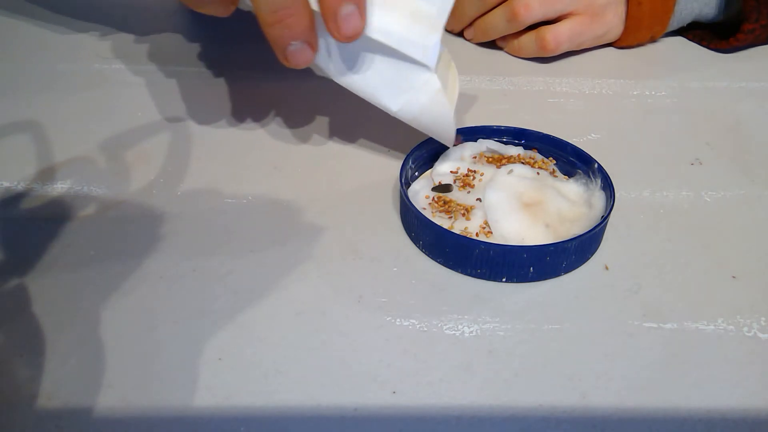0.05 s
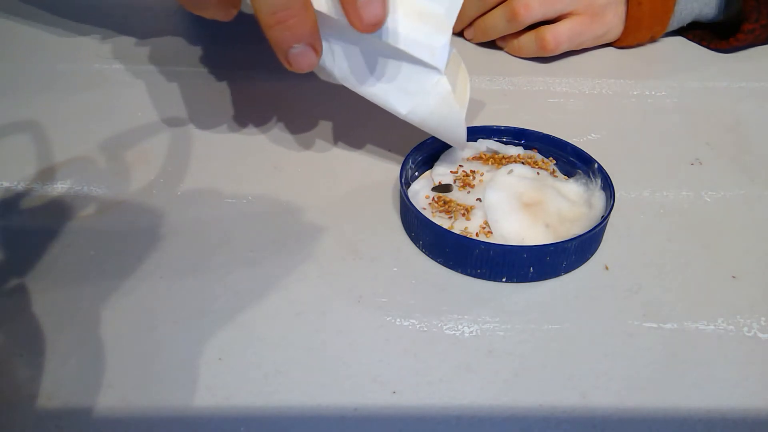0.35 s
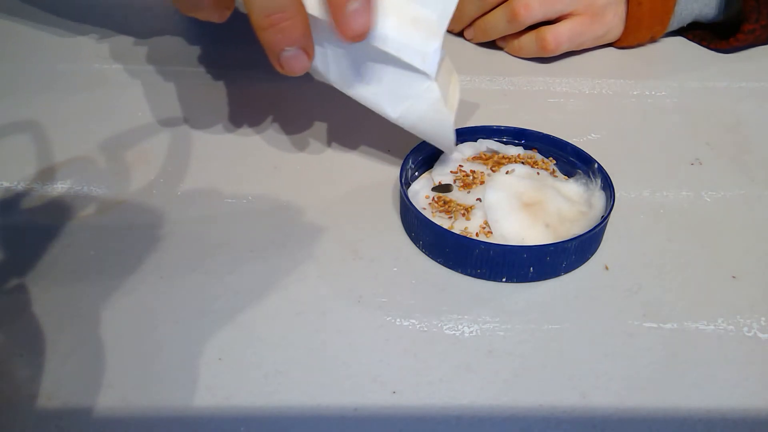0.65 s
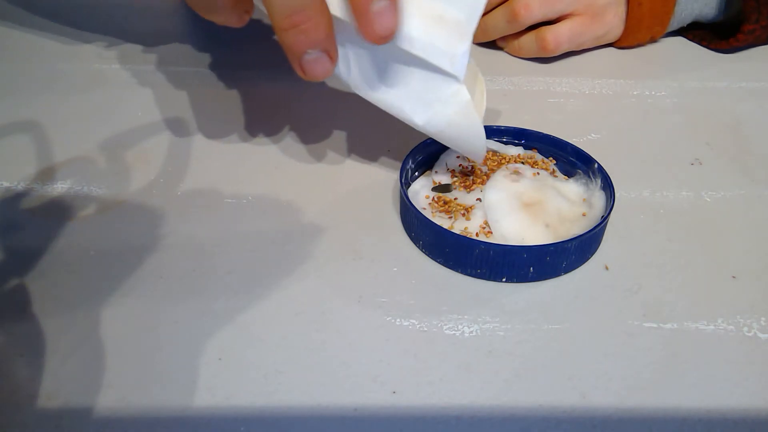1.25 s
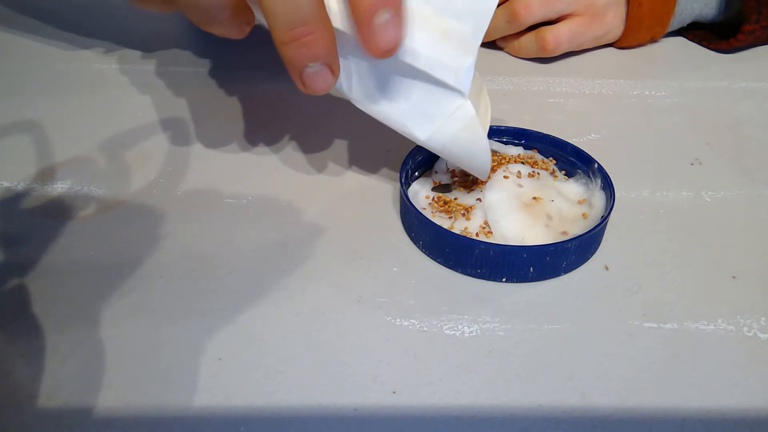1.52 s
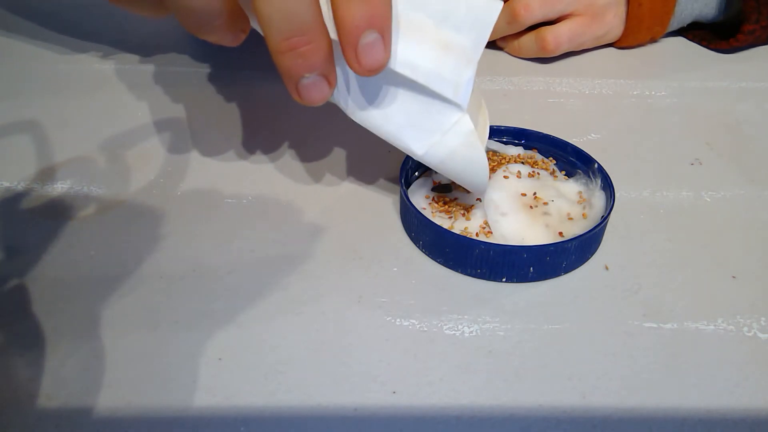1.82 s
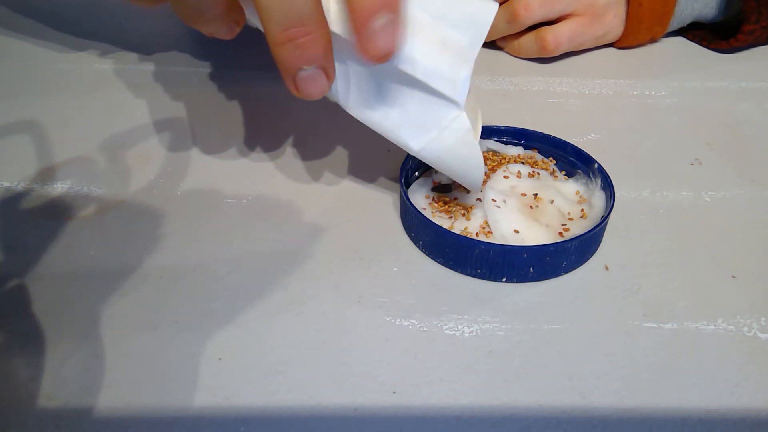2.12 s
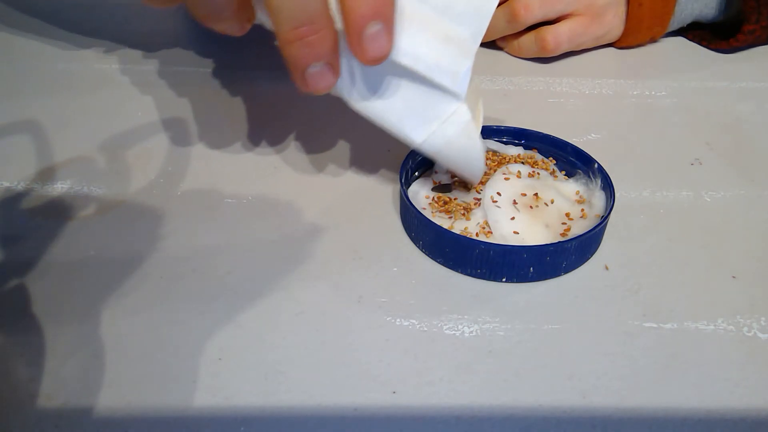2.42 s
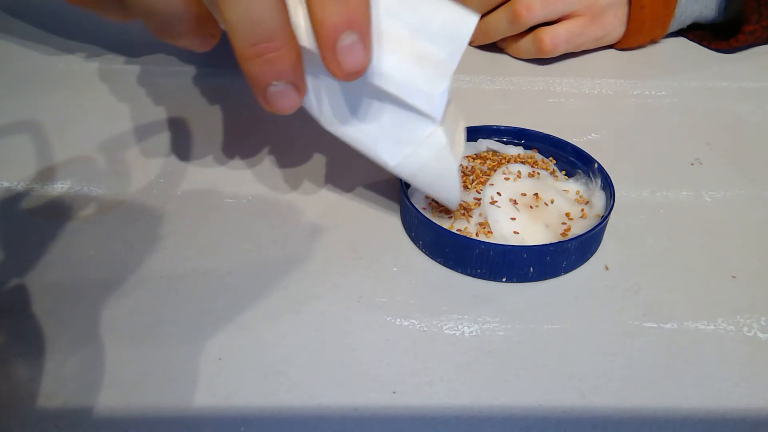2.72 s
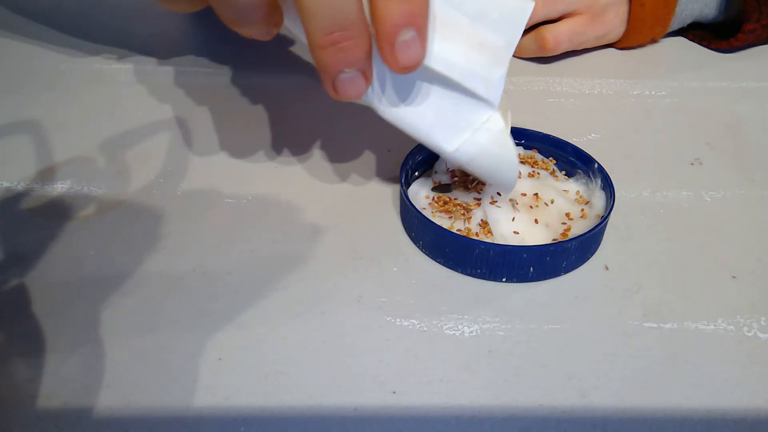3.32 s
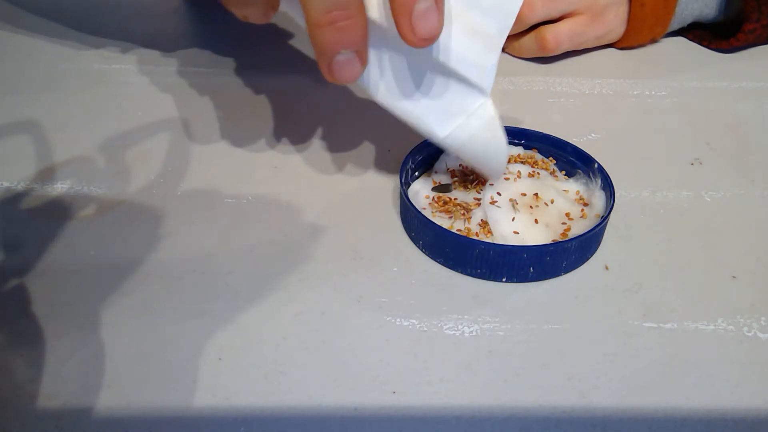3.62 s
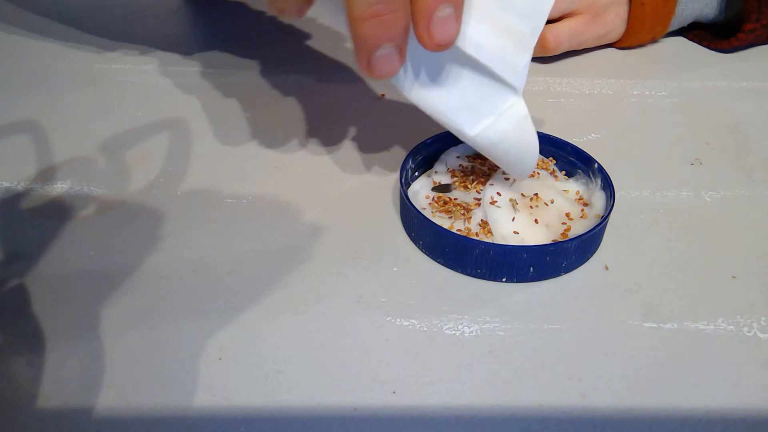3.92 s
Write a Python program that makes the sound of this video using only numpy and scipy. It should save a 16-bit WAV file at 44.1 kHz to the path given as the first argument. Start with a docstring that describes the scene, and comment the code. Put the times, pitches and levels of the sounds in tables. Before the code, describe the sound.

Small seeds trickle out of a paper packet with a dry, bright rattle, shaken along by quick, even finger taps that knock and crackle the paper. The stream dwindles to single ticking seeds, and the last taps are clearly louder. The microphone is close, with the packet to the left, in a quiet small room with faint background noise and electrical hum.

```python
"""In a small room, close by and left of centre, a finger taps a folded paper packet about four times a
second to shake small seeds onto damp cotton in a lid. Each tap knocks the paper and cracks its creases;
between taps the finger comes off with a tick and scuffs it. Seeds slide down the fold as a dense rattle
that thins to single ticks while the taps get harder. A faint mains hum lies underneath."""
import sys
import numpy as np
from scipy import signal
from scipy.fft import rfft, irfft, next_fast_len
from scipy.io import wavfile
from scipy.ndimage import uniform_filter1d

SR = 44100
rng = np.random.default_rng(int(sys.argv[2]) if len(sys.argv) > 2 else 0)


def file_out(sig):
    """Save sig as 16-bit WAV at sys.argv[1]."""
    # one column per channel
    cols = np.atleast_2d(sig).T
    # limit, then scale
    lim = np.clip(cols, -1, 1)
    pcm = np.round(lim * 32767).astype(np.int16)
    wavfile.write(sys.argv[1], SR, pcm)


N = 183038
TIME = np.arange(N) / SR
AGE = TIME[:SR // 8]   # seconds since a contact

# The supply of sliding seeds. Each row: time in seconds, relative level in dB.
SEED_SUPPLY = [(0.0, -49.5), (0.1, -48.5), (0.24, -49.5), (0.6, -47.5), (1.0, -50.5), (1.26, -52.5),
               (1.33, -57.5), (1.385, -62), (1.43, -56), (1.48, -63.5), (1.52, -56), (1.7, -53.5),
               (1.74, -58), (1.77, -66.5), (1.8, -59), (1.83, -55.5), (1.9, -65.5), (1.92, -55),
               (2.0, -53.5), (2.05, -50.5), (2.12, -50.5), (2.29, -51), (2.42, -56.5), (2.76, -55.5),
               (2.84, -58), (3.2, -63), (3.44, -61.5), (3.7, -67.5), (3.85, -76), (3.95, -83), (4.06, -86),
               (4.15, -81)]
# The tone of seeds on paper. Each row: frequency in Hz, gain in dB.
SEED_TONE = [(150, -36), (500, -27.5), (1000, -21), (1350, -2), (2100, -3.5), (3000, -4), (4400, -2),
             (5600, -2.5), (7500, -2), (9500, -3), (12500, -3.5), (16000, -7)]
# The finger comes off. Each row: start in seconds, tick level in dB, then for each of two slips
# its delay in seconds and its level in dB.
FINGER_LIFTS = [(0.0587, -38, 0.011, -48, 0.024, -48), (0.2722, -38, 0.0069, -40, 0.016, -44),
                (0.4991, -43.5, 0.011, -45, 0.038, -51), (0.7455, -43, .016, -60, .024, -48.5),
                (0.9708, -40.5, 0.016, -45, 0.014, -52.5), (1.195, -42, .012, -43.5, 0.016, -55),
                (1.406, -44.5, .024, -65, 0.026, -49.5), (1.611, -42, 0.013, -44.5, 0.021, -48.5),
                (1.815, -43.5, .011, -42.5, .019, -50), (2.0045, -50, 0.011, -70, 0.02, -73),
                (2.2091, -43.5, 0.021, -49.5, 0.04, -49), (2.4444, -49, 0.031, -64, 0.044, -51.5),
                (2.6725, -46.5, .036, -49.5, 0.036, -59), (2.869, -43, .013, -44.5, .022, -49),
                (3.0845, -41.5, .009, -40, 0.016, -44), (3.2929, -40.5, 0.0076, -39, .013, -44.5),
                (3.5257, -43.5, .015, -52, .030, -44.5), (3.753, -42, .012, -47.5, 0.019, -42),
                (3.9761, -39.5, .009, -47, 0.013, -39)]
# The finger lands. Each row: start in seconds, level in dB, gains of the low rings, the high rings and
# the crack in dB, pitch as a ratio, level in dB of the graze just before.
FINGER_TAPS = [(0.145, -39, -2.5, 2, -2.5, 0.99, -48), (0.352, -38.5, -2.5, 1, -5.5, 0.99, -47),
               (0.634, -39, -3, 11, -25, 0.95, -47.5), (0.857, -36.5, -9.5, -4, -5.5, 1.02, -47),
               (1.056, -36.5, -4.5, -4, -11, 0.98, -50), (1.273, -39.5, 4.5, 10, -6.5, 0.96, -54),
               (1.491, -39, 0, 7, -8, 0.96, -59), (1.692, -36, -2, 10, -9, 0.95, -52),
               (1.909, -35.5, -0.5, 9, -8, .94, -50), (2.315, -37.5, 6.5, 8, -2, 0.89, -47.5),
               (2.533, -39.5, -1, 2, -6, 0.94, -55), (2.753, -40, 14, 20, 1.5, 0.94, -53.5),
               (2.973, -24.5, -9.5, 14, -7, 1.004, -57), (3.177, -24.5, -9.5, 15, -9.5, 1.01, -49),
               (3.421, -26, -6.5, 11, -5.5, 1.005, -51), (3.639, -25, -10.5, 9.5, -7.5, 1, -48),
               (3.865, -32, 4.5, 11, -1.5, 0.94, -65), (4.095, -30.5, 0.5, 12, -4.5, 1.003, -53)]


def from_db(db):
    return 10 ** (np.asarray(db) / 20)


def rms_one(x):
    """Scale a signal so that its average level (rms) is 1."""
    return x / np.sqrt(np.mean(x ** 2) + 1e-20)


def peak_one(x):
    """Scale a hit so that its loudest three milliseconds have rms 1."""
    return x / np.sqrt(uniform_filter1d(x ** 2, size=132).max())


def at_hz(points, hz):
    """Read a curve of (Hz, dB) points, with octaves evenly spaced."""
    point_hz, point_db = np.transpose(points)
    return np.interp(np.log(hz + 1e-9), np.log(point_hz), point_db)


def colour(x, tone, peaks=()):
    """Filter a sound by a tone curve (Hz, dB) with peaks (Hz, width in Hz, gain in dB) on top."""
    n = 2 * next_fast_len(x.shape[-1])
    hz = np.arange(n // 2 + 1) * SR / n
    db = at_hz(tone, hz) + sum(gain / (1 + (2 * (hz - f) / width) ** 2) for f, width, gain in peaks)
    # minimum phase: the filter rings after a hit, never before it
    cepstrum = irfft(np.log(from_db(db)))[:n // 2]
    cepstrum[1:] *= 2
    return irfft(rfft(x, n) * np.exp(rfft(cepstrum, n)))[..., :x.shape[-1]]


def add(track, s, sound):
    """Mix a sound into a track, starting at s seconds."""
    i = max(round(s * SR), 0)
    track[..., i:i + sound.shape[-1]] += sound[..., :N - i]


def drift(per_s):
    """A smooth random wander, about 1 in size."""
    r = np.exp(-2 * np.pi * per_s / SR)
    return rms_one(signal.lfilter([1], [1, -2 * r, r * r], rng.standard_normal(N + SR))[SR:])


def burst(rise_s, t60):
    """A cluster of tiny contacts that swells, and fades by 60 dB in t60 seconds."""
    return rng.standard_normal(len(AGE)) * (1 - np.exp(-(AGE / rise_s) ** 2)) * from_db(-60 * AGE / t60)


def seed_flow():
    """The strength of the stream in dB: the slow supply plus a surge after every lift and tap."""
    surges = np.zeros(N)
    for jolts, height_db, crest_s in ((FINGER_LIFTS, 1, 0.038), (FINGER_TAPS, 3, 0.0032)):
        swell = (AGE / crest_s) ** 2
        for s, *_ in jolts:
            add(surges, s, height_db * swell * np.exp(1 - swell))
    return np.interp(TIME, *np.transpose(SEED_SUPPLY)) + surges


def collisions(full_per_s=6000, trickle_per_s=260, full_db=-50, size_db=4.5, clump_db=2.0):
    """Seeds collide in little avalanches; a weaker stream has fewer hits and comes more unevenly."""
    flow_db = seed_flow()
    fullness = from_db(flow_db - full_db)
    per_s = full_per_s * fullness + trickle_per_s
    hits = rng.random(N) < per_s * from_db(clump_db * drift(45)) / SR
    sizes = rms_one(from_db(size_db * np.minimum(rng.exponential(1, N), 3.5)))
    signs = rng.choice([-1, 1], N)
    flicker_db = 0.69 * drift(77) / (1 + fullness)
    return hits * sizes * signs * np.sqrt(SR / per_s) * from_db(flow_db + 8 + flicker_db)


def paper_spot(rise_s, t60, alike=0.2):
    """Each spot of the paper snaps in its own way, shivers briefly and sounds different on each side."""
    left, other = [burst(rise_s, t60) + from_db(-21.5) * burst(0.00037, 0.025) for side in range(2)]
    right = alike * left + np.sqrt(1 - alike ** 2) * other
    return np.array([left, right]) / np.sqrt(np.sum(left ** 2))


def flexing_fold(stream, bend=0.014):
    """The seeds make the fold ring; its pitch wanders as the paper flexes between slack and taut."""
    # The rings of the fold. Each row: pitch in Hz, width in Hz, gain in dB.
    rings = [(1720, 450, 6), (2086, 135, -5), (3140, 160, 3.5), (3680, 374, 9.5), (4040, 450, 5),
             (4600, 310, -3.5), (4960, 340, 4), (6470, 310, -1.5), (7000, 540, 2.5), (9200, 230, -3),
             (11300, 290, -2.5), (13900, 440, 1)]
    slack, taut = [colour(stream, SEED_TONE, [(hz * ratio, width, db) for hz, width, db in rings])
                   for ratio in (1 - bend, 1 + bend)]
    tension = .5 + .5 * np.tanh(drift(per_s=4))
    return (1 - tension) * slack + tension * taut


def sliding_heap(stream):
    """The heap of seeds slides inside the packet and drums on it."""
    # How strongly it drums. Each row: time in seconds, gain on the stream in dB.
    strength = [(0, -1.5), (.6, -2), (1.2, -4), (1.5, -6.5), (2.1, -24), (2.7, -6.5), (3.3, -3), (4.15, 5)]
    # Its dull tone. Each row: frequency in Hz, gain in dB.
    tone = [(100, -17.5), (480, -11.5), (700, -13), (1030, -22.5), (1250, -3), (1900, 1.5), (2300, -22),
            (4000, -16.5), (16000, -41)]
    # The rings it sets off. Each row: pitch in Hz, width in Hz, gain in dB.
    rings = [(880, 106, 16.5), (1308, 110, 7), (1725, 344, 9)]
    return colour(stream * from_db(np.interp(TIME, *np.transpose(strength))), tone, rings)


def stray_seeds(per_s=36, until_s=3.9, low_hz=4500, high_hz=15600, spread_db=4.5):
    """Seeds bounce at random until the packet is nearly empty. Gives rows of seconds, dB and Hz."""
    slots = np.arange(int(per_s * until_s))
    when, spot, size = rng.random((len(slots), 3)).T
    s = (slots + when) / per_s
    # they stand out only once the stream is thin
    typical_db = np.minimum(np.interp(s, *np.transpose(SEED_SUPPLY)) + 11, -50.5)
    db = typical_db + spread_db * (2 * size - 1)
    return list(zip(s, db, low_hz * (high_hz / low_hz) ** spot))


def seed_tick(hz):
    """One seed strikes the paper, ringing at its own pitch, at a nearby one and at those of the fold."""
    softness = from_db(7 * rng.uniform(-1.05, 1))   # some land squarely, others glance off
    nearby_hz = hz * rng.uniform(0.73, 1.2)
    snap = paper_spot(rise_s=0.0018 * softness, t60=0.01 * softness)
    peaks = [(hz, hz / 4, 8), (nearby_hz, 260, 10), (3800, 550, 6), (4950, 300, 3), (6820, 500, 3)]
    return peak_one(colour(snap, SEED_TONE, peaks))


def seeds(spots=16):
    """The stream rattles on many spots of the fold, the heap drums below, single seeds tick on top."""
    # The loudest single seeds. Each row: start in seconds, relative level in dB, favoured pitch in Hz.
    loud_seeds = [(0.159, -49, 3960), (0.472, -33.5, 4100), (0.619, -42, 3660), (0.951, -40, 3920),
                  (1.151, -40.5, 3970), (1.168, -41, 3700), (1.354, -49, 3800), (1.399, -46.5, 4600),
                  (1.429, -44.5, 4860), (1.442, -50, 4500), (1.5, -43.5, 3600), (1.755, -43.5, 7200),
                  (1.773, -46.5, 7150), (1.794, -44.5, 3630), (1.856, -42, 4430), (2.022, -39, 4340),
                  (2.243, -42, 4270), (2.395, -38.5, 3770), (2.439, -39.5, 4030), (2.538, -37, 4600),
                  (2.605, -38, 7100), (2.712, -39, 5040), (2.78, -49, 7300), (2.788, -59, 9100),
                  (2.867, -37, 7700), (2.893, -47, 11200), (2.915, -56, 3830), (2.929, -49, 6960),
                  (3.039, -51, 10000), (3.063, -50, 6000), (3.095, -46.5, 11100), (3.143, -41.5, 4300),
                  (3.155, -47, 4040), (3.16, -41.5, 4670), (3.23, -43, 13100), (3.235, -54, 12000),
                  (3.3264, -47, 7940), (3.3875, -51, 11000), (3.399, -45.5, 9100), (3.426, -44.5, 11900),
                  (3.463, -42.5, 11000), (3.48, -47, 8850), (3.49, -54, 7000), (3.517, -43.5, 13300),
                  (3.555, -52, 7300), (3.571, -57, 9000), (3.598, -45, 11000), (3.615, -50, 10500),
                  (3.674, -53, 8000), (3.678, -54, 11000), (3.703, -45.5, 5800), (3.739, -62, 12000),
                  (3.817, -58, 7200), (3.842, -58, 14000), (3.846, -55, 11000), (3.916, -58, 14900),
                  (4.02, -62, 13200), (4.031, -66, 13000)]
    clicks = collisions()
    spot_hit = rng.integers(0, spots, N)
    stream = np.zeros((2, N))
    for spot, hz in enumerate(np.geomspace(2500, 14000, spots)):   # each spot favours its own pitch
        snap = paper_spot(rise_s=0.0006, t60=0.0062)
        snap = colour(snap, [(1000, 0.0), (16000, -4.5)], [(hz, hz / 3, 8)])
        stream += signal.oaconvolve([clicks * (spot_hit == spot)], snap, axes=1)[:, :N]
    out = flexing_fold(stream) + sliding_heap(stream[0])
    for s, db, hz in loud_seeds + stray_seeds():
        add(out, s, from_db(db - 1.33) * seed_tick(hz))
    return out


def background(waver_db=2):
    """Faint room noise and a wavering mains hum, a little louder on the left."""
    # The low noise of the room. Each row: frequency in Hz, gain in dB.
    air_tone = [(20, 5), (42, 7), (70, -0.5), (130, -6), (250, -1), (500, -20.5), (1000, -11.5),
                (3000, -56), (8000, -31), (16000, -48)]
    # The notes of the hum. Each row: pitch in Hz, relative level in dB.
    hum_notes = [(49, -83), (98, -82.5), (147.4, -77.5), (296, -84.5)]
    air = rms_one(colour(rng.standard_normal(N) + .5 * rng.standard_normal((2, N)), air_tone))
    hum = np.zeros(N)
    for hz, db in hum_notes:
        level = from_db(db + waver_db * drift(8.2))
        hum += level * np.sqrt(2) * np.sin(2 * np.pi * hz * TIME + drift(0.81))
    return (from_db(-74.5) * air + hum) * from_db([[1.5], [-1.5]])


def knock(low_db, high_db, hollow_hz, face_ratio, rise_s, damping):
    """The packet rings as the soft fingertip bends it; the squeeze tunes its hollow and its flat face."""
    # The rings of the held packet. Each row: base pitch in Hz, relative level in dB,
    # seconds to fade by 60 dB when damping is 1.
    packet_rings = [(147.3, -29, 0.15), (239, -21.5, 0.13), (301, -16, 0.034), (364.5, -25.5, 0.058),
                    (470, 5, 0.026), (556, -5.5, 0.024), (673, -10, 0.033), (730, -18.5, 0.037),
                    (929, -9.5, 0.046), (1010, -18.5, 0.0099), (1363, -1, 0.023), (1479, 7, 0.013),
                    (1492, 11.5, 0.0082), (1875, -25.5, 0.048), (2485, -6.5, 0.011), (2870, -23, 0.0081),
                    (2960, -8, 0.0085), (3670, -13, 0.0081), (4600, -32, 0.0032)]
    hz, db, t60 = np.transpose(packet_rings)[:, :, None]
    shift, strength = rng.standard_normal((2, len(packet_rings), 1))
    scatter = np.where(hz > 1700, .03, .018)   # high rings change most from blow to blow
    is_hollow = (hz > 420) & (hz < 505)   # the strongest low ring
    face_tuning = np.where(hz > 1200, face_ratio, 1)
    hz = np.where(is_hollow, hollow_hz, hz) * face_tuning * (1 + scatter * shift)
    db = db + .8 * strength + at_hz([(700, low_db), (1300, 0), (1700, 0.014), (2300, high_db)], hz)
    rings = from_db(db - 60 * AGE * damping / t60) * np.sin(2 * np.pi * hz * (AGE - rise_s))
    swell = 1 - np.exp(-(AGE / rise_s) ** 2)
    return peak_one(rings.sum(axis=0) * swell)


def finger_lifts():
    """The paper springs back with a small bright knock, then sticks and slips twice on the skin."""
    # The snap of paper springing back. Each row: frequency in Hz, gain in dB.
    snap_tone = [(500, -25), (2500, 12), (4500, 16), (7500, 20), (10000, -19), (16000, -4)]
    out = np.zeros(N)
    for s, db, slip_s, slip_db, other_slip_s, other_slip_db in FINGER_LIFTS:
        spring = knock(low_db=-6, high_db=2.5, hollow_hz=471, face_ratio=1.01, rise_s=.0012, damping=.43)
        snap = peak_one(colour(burst(rise_s=0.0023, t60=0.0092), snap_tone))
        add(out, s, from_db(db) * (spring + from_db(-17.5) * snap))
        add(out, s + slip_s, from_db(slip_db) * slip())
        add(out, s + other_slip_s, from_db(other_slip_db) * slip())
    return out


def slip():
    """The paper jerks across the skin in one short, uneven rub."""
    # The tone of the scuff. Each row: frequency in Hz, gain in dB.
    scuff_tone = [(80, -18), (200, 0), (420, 3), (750, -1), (1100, -6.5), (1500, 3), (1900, -6),
                  (2400, -2.5), (3200, -33), (6000, -30), (16000, -44)]
    force = from_db(2.2 * rms_one(uniform_filter1d(rng.standard_normal(len(AGE)), size=90)))
    rub = peak_one(colour(burst(rise_s=0.0023, t60=0.045) * force, scuff_tone))
    return colour(rub, [(900, 0), (1400, -1.5)])   # slightly softer treble


def finger_taps(graze_lead_s=0.008):
    """The fingertip grazes the paper, then knocks it; the creases crack with the blow."""
    # A hard blow squeezes the hollow and raises its pitch. Each row: tap level in dB, base pitch in Hz.
    hollow_pitch = [(-27.5, 486), (-24.5, 511)]
    # The tone of cracking creases. Each row: frequency in Hz, gain in dB.
    crack_tone = [(100, -23.5), (500, 0.5), (1000, 2), (1500, 5.5), (2100, -0.5), (2600, -8), (3200, -5.5),
                  (4500, -10), (8000, -24), (16000, -46)]
    # The tone of soft skin on paper. Each row: frequency in Hz, gain in dB.
    graze_tone = [(80, -9), (200, -1), (450, 6), (900, -6), (1500, -2), (3000, -11), (16000, -68)]
    out = np.zeros(N)
    for s, db, low_db, high_db, crack_db, pitch_ratio, graze_db in FINGER_TAPS:
        hollow_hz = pitch_ratio * np.interp(db, *np.transpose(hollow_pitch))
        thud = knock(low_db, high_db, hollow_hz, pitch_ratio, rise_s=0.003112, damping=0.78)
        crack = from_db(crack_db) * peak_one(colour(burst(rise_s=0.0026, t60=0.021), crack_tone))
        graze = peak_one(colour(burst(rise_s=0.00051, t60=0.13), graze_tone))
        add(out, s, from_db(db) * peak_one(thud + crack))
        add(out, s - graze_lead_s, from_db(graze_db) * graze)
    return out


def room_echo(x, t60=0.24, gain_db=-12.5):
    """The small room answers with a short wash of echoes, different on each side."""
    # The tone of the echoes. Each row: frequency in Hz, gain in dB.
    echo_tone = [(100, 6.5), (500, 1), (1500, -6.5), (4000, -6.5), (8000, -11), (16000, -11)]
    age = TIME[:SR // 2]
    tail = rng.standard_normal((2, len(age))) * from_db(-60 * age / t60) * (1 - np.exp(-age / 0.0076))
    tail *= 1 + 1.07 * np.exp(-age / 0.017)   # the table top and near things answer first
    tail /= np.sqrt(np.sum(tail[0] ** 2))
    return from_db(gain_db) * colour(signal.oaconvolve([x], tail, axes=1)[:, :N], echo_tone)


def scene():
    """Paper and seeds are on the left, so the right side hears them softer and a little later."""
    # What reaches the right side from the paper. Each row: frequency in Hz, gain in dB.
    paper_shadow = [(150, -5), (500, -7), (1000, -10), (1500, -12), (2800, -15.5), (4000, -14.5),
                    (8000, -21), (14000, -6)]
    # What reaches it from the seeds. Each row: frequency in Hz, gain in dB.
    seed_shadow = [(500, -3), (1000, -6), (2000, -6), (4000, -0.5), (7000, -1.5), (10000, -3), (14000, -8)]
    # The mouth of the packet turns. Each row: time in seconds, extra cut in dB to seeds on the right.
    aim = [(0.0, 10), (0.85, 9.5), (1.31, 13), (1.5, 20), (2.23, 11.5), (2.71, 16), (3.13, 23), (3.42, 23),
           (3.7, 20)]
    paper = finger_taps() + finger_lifts()
    rattle = seeds()
    left = paper + rattle[0]
    aim_gain = from_db(-np.interp(TIME, *np.transpose(aim)))
    right = colour(paper, paper_shadow) + colour(rattle[1], seed_shadow) * aim_gain
    right = np.interp(TIME - 3 / SR, TIME, right)   # three samples later
    return np.array([left, right]) + room_echo(paper + from_db(-5.5) * rattle[0]) + background()


def record(dry, cutoff_hz=16000):
    """The highest treble is cut steeply."""
    return signal.sosfilt(signal.ellip(12, .1, 70, cutoff_hz, fs=SR, output="sos"), dry)


dry = scene()
out = record(dry)
file_out(out)
```